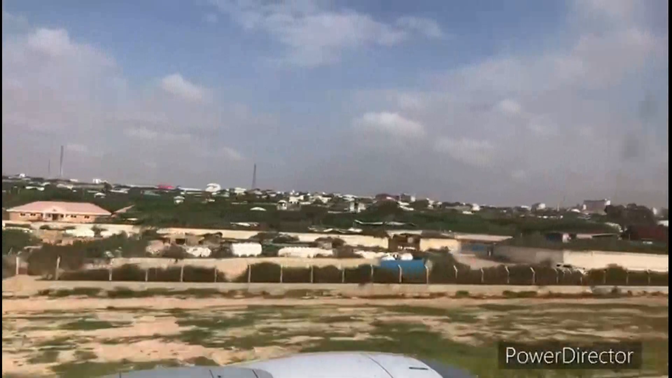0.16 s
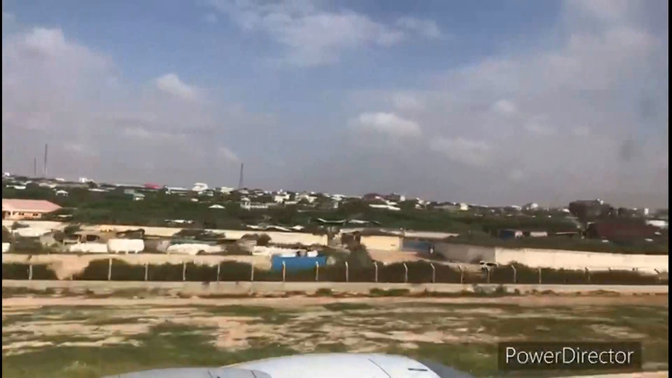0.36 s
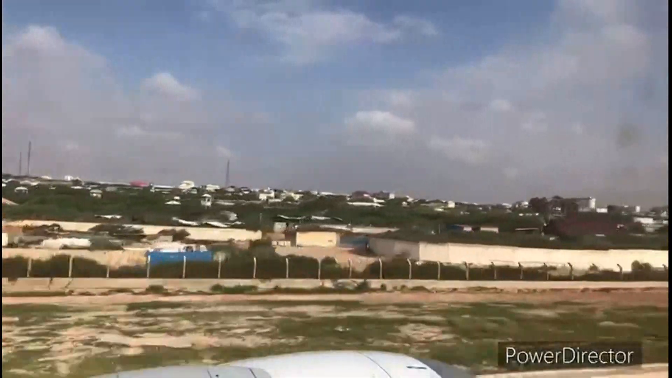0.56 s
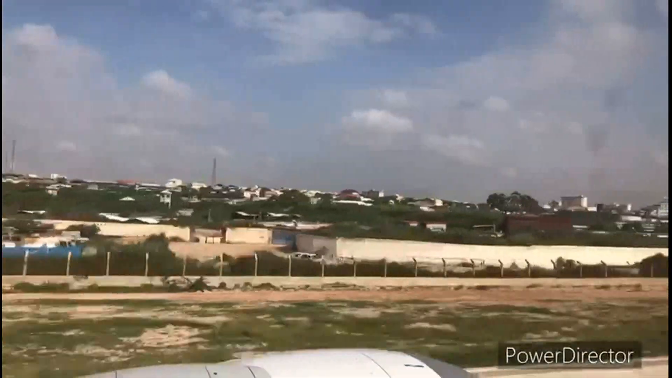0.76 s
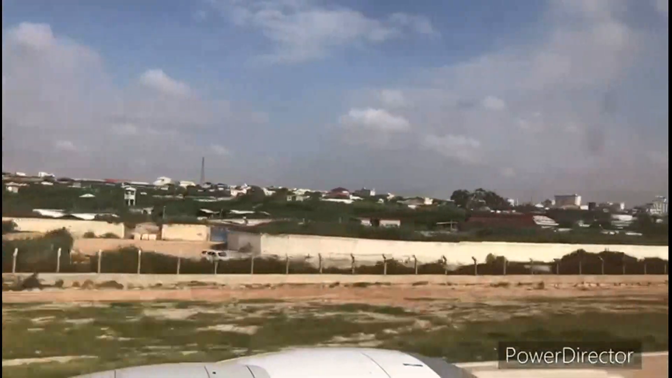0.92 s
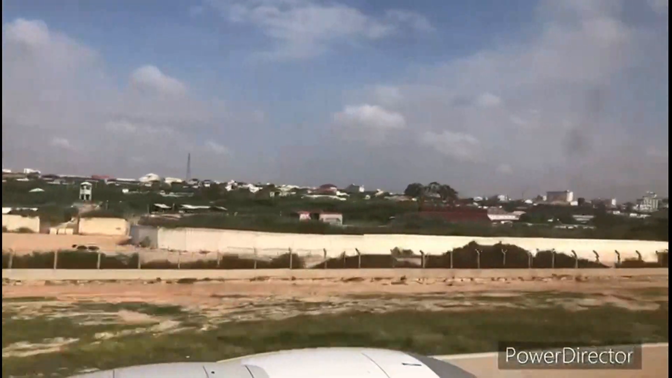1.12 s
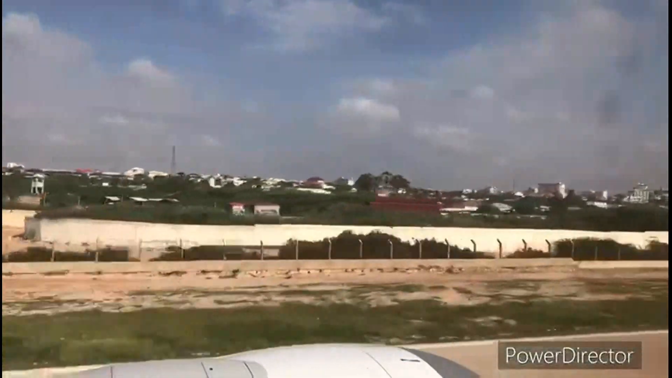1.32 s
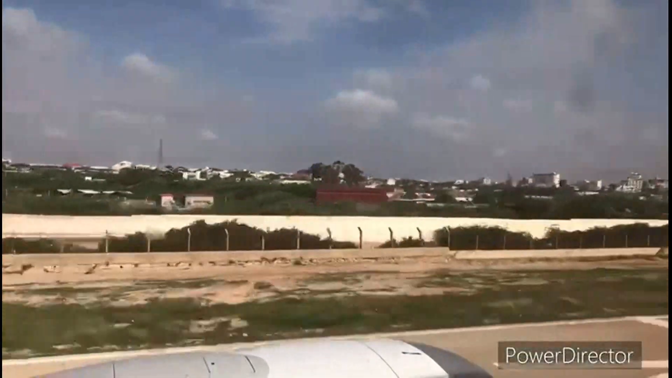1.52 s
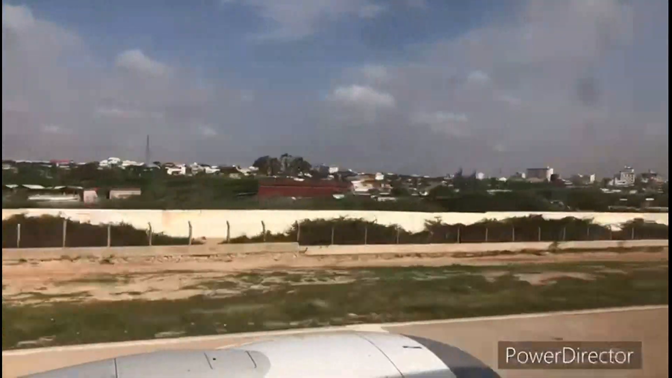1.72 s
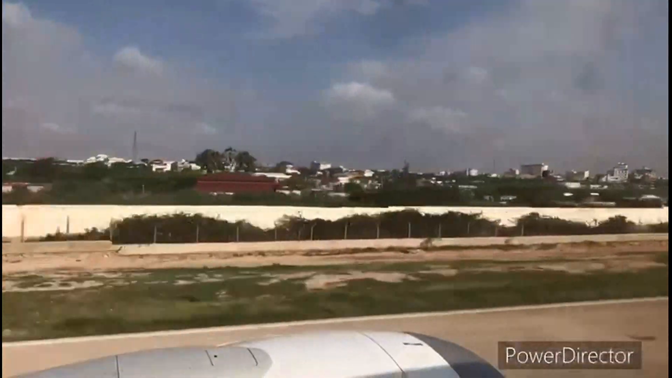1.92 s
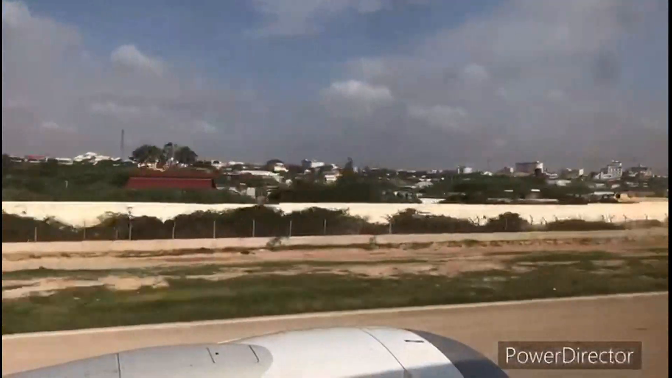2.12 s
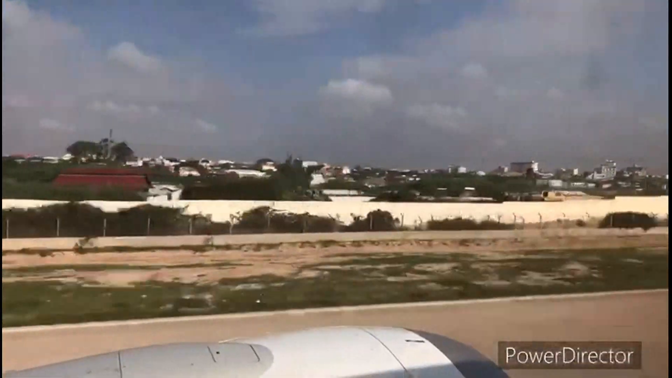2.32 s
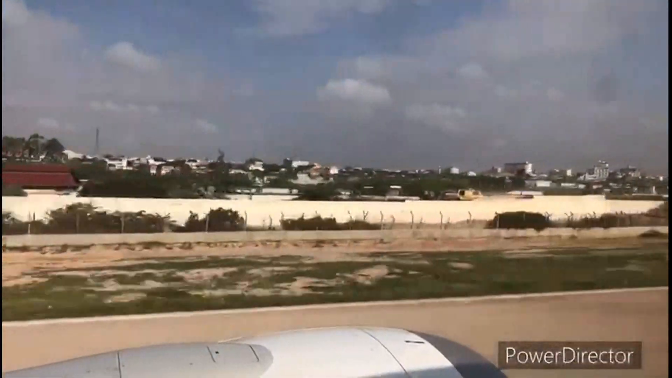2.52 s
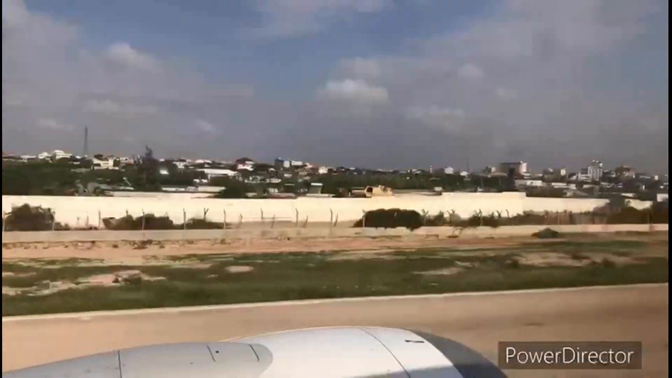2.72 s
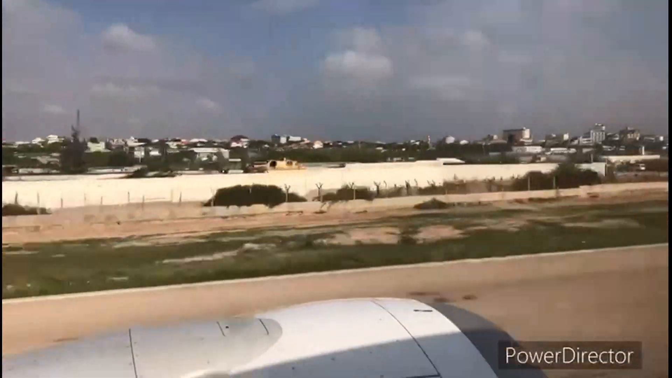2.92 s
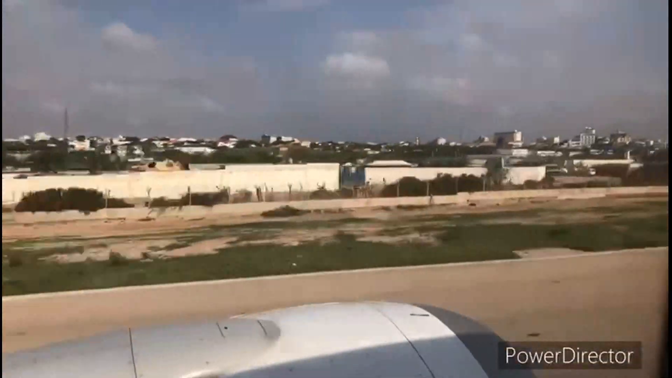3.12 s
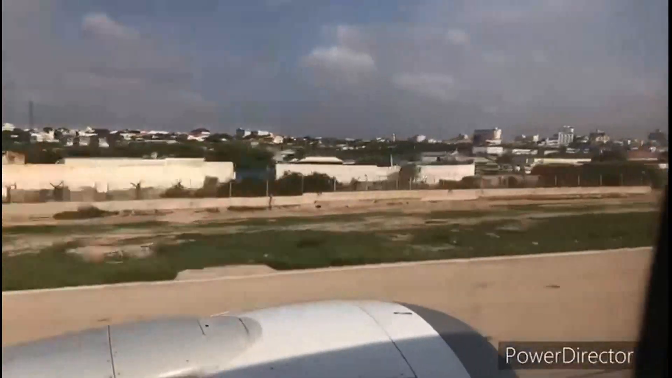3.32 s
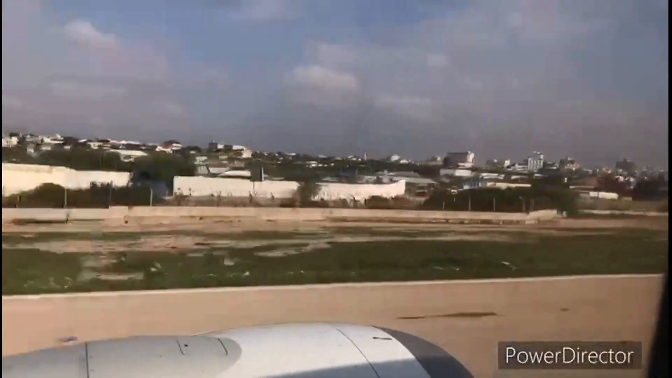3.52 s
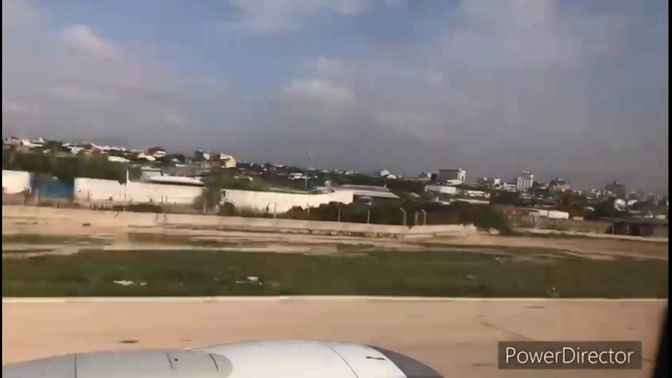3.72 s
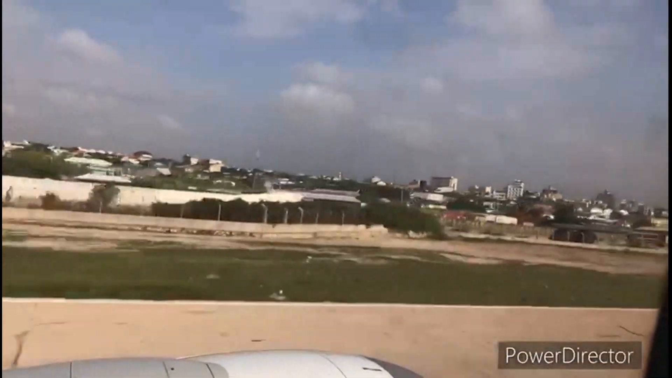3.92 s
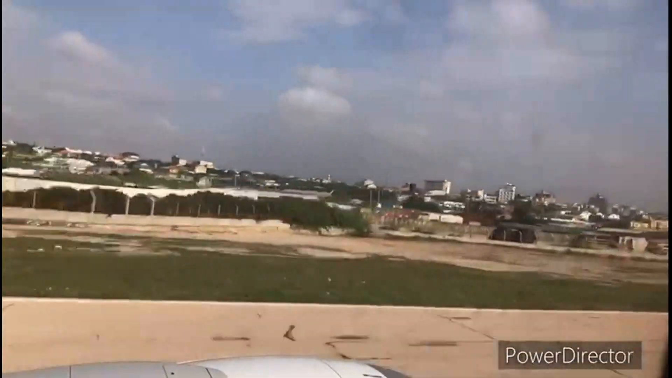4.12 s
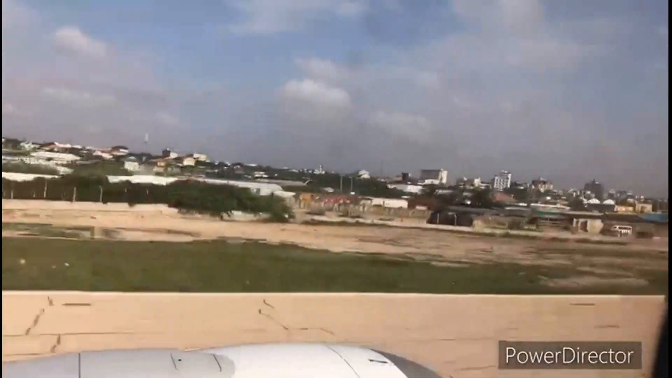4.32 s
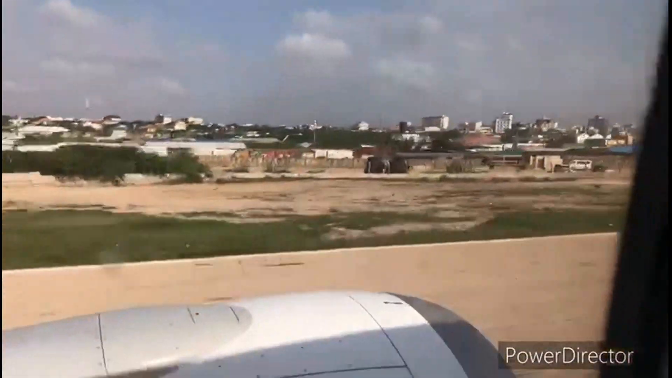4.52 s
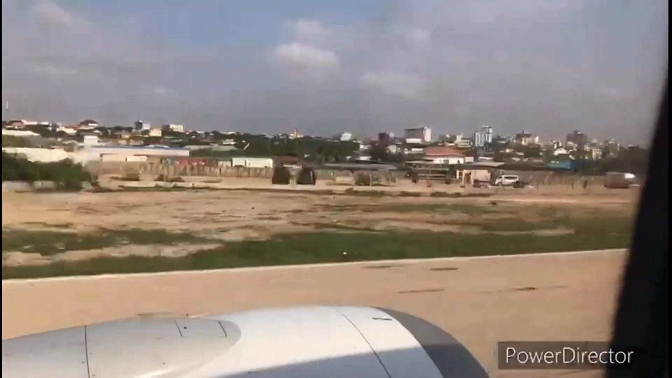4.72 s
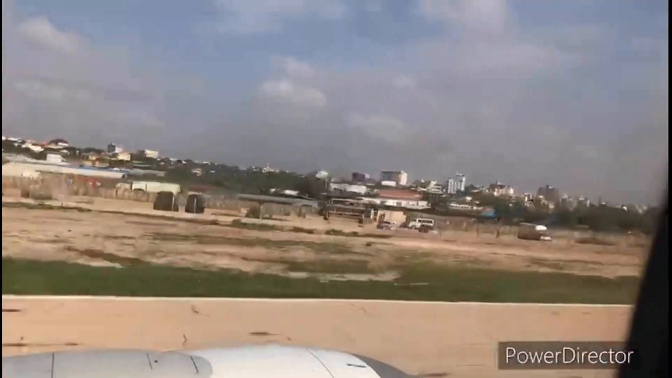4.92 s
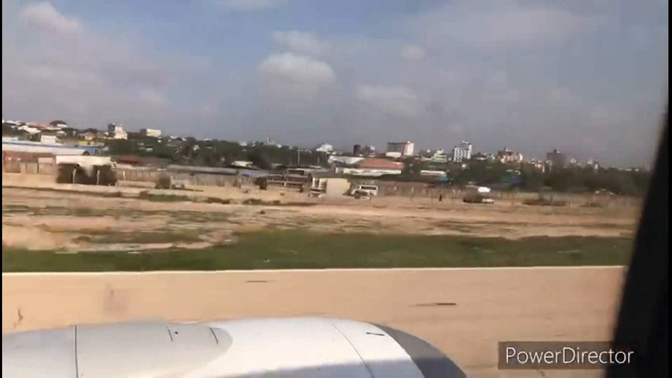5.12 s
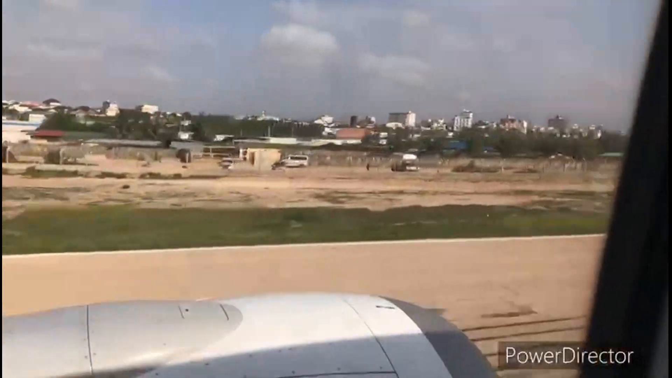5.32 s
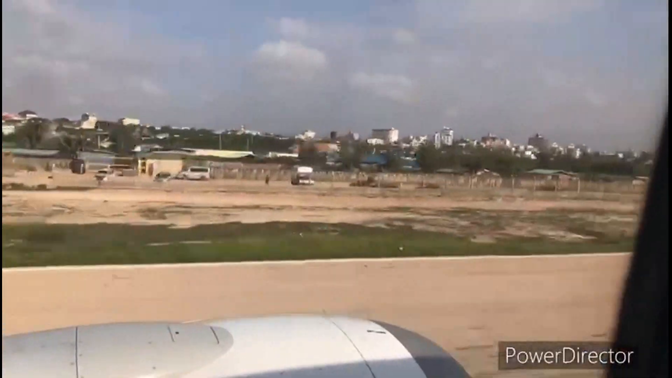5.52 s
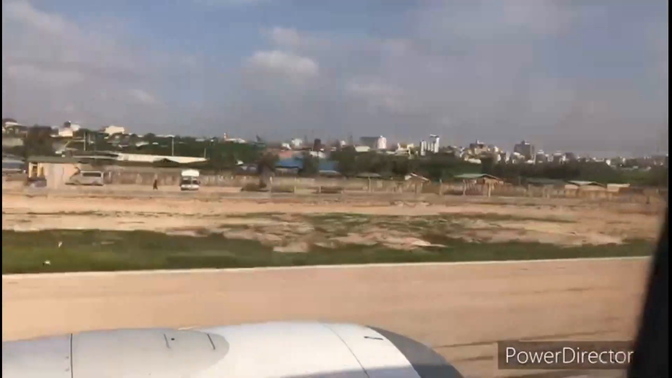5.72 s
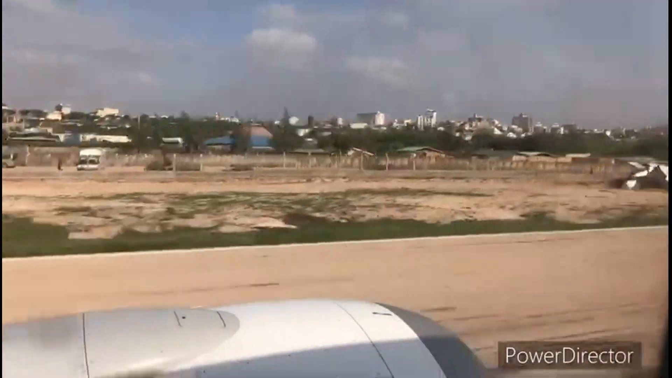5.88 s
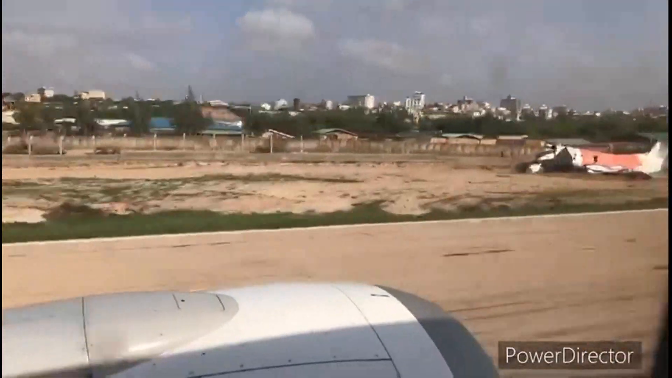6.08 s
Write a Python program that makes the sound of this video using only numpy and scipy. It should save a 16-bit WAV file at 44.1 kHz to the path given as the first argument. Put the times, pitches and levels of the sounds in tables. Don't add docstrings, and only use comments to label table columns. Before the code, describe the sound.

A phone microphone in a landing jet's cabin picks up low rushing air and fuzzy, falling engine hum. Touchdown brings uneven bumps through the floor and shaking panels, then a brief easing with a sharp knock. Rumble returns heavier, with loose fittings clattering nearby, and muffled reverse thrust builds to a loud roar that is still going at the end.

```python
import sys
import numpy as np
from scipy import signal
from scipy.fft import rfft, irfft, next_fast_len
from scipy.io import wavfile
from scipy.ndimage import uniform_filter1d

SR = 44100
rng = np.random.default_rng(int(sys.argv[2]) if len(sys.argv) > 2 else 0)


def ratio_of_db(decibels):
    return 10 ** (np.asarray(decibels, float) / 20)


def int16_out(signal):
    q = np.round(np.clip(np.atleast_2d(signal).T, -1, 1) * 32767)
    wavfile.write(sys.argv[1], SR, q.astype(np.int16))


N = 271215

# freq_hz, density_db (per Hz)
HULL_COLOUR = [(15, -45), (30, -25), (48, -1), (95, -2.5), (142, 0), (198, -4.5), (240, -5.5), (340, -9),
               (460, -16.5), (600, -21), (760, -30), (890, -27), (1080, -41), (1600, -61), (2500, -85)]
# freq_hz, density_db (per Hz)
VENT_COLOUR = [(700, -5), (1100, -1.5), (1400, -4.5), (1950, -3.5), (2500, -9.5), (2950, -9), (3260, -18.5),
               (4000, -23), (4900, -27), (7000, -27.5), (7600, -31.5), (9500, -30), (10400, -35.5),
               (11400, -34.5)]
# time_s, change_db
AIR_CHANGE = [
    (0, 0.5),
    (.6, 0),
    (1.5, 0),
    (2.6, -0.5),
    (3.3, -1.5),
    (4.0, 0),
    (5.0, 0),
    (6.15, 1),
]
# pitch_hz, level_db (rms), width_hz
ENGINE_WHINES = [(332, -47, 20), (888, -67, 30), (1491, -71, 25), (1863, -77, 15), (2542, -79, 20),
                 (3526, -97, 8), (5023, -100, 8), (6615, -100, 4)]
# time_s, pitch_hz, level_db (rms)
FAN_HUM = [(0, 156.1, -32.5), (.6, 149.6, -36.5), (.9, 133.8, -41), (1.3, 128.8, -43.5),
           (1.9, 128.9, -36.5), (2.35, 125.2, -49.5), (2.7, 137.3, -40.5), (6.15, 136, -46.5)]
# time_s, pitch_hz, level_db (rms)
CORE_TONE = [(0, 474.3, -54.5), (.6, 472, -50), (.9, 468, -55.5), (1.3, 467, -50.5), (1.9, 458.6, -48.5),
             (2.3, 457, -54), (2.6, 457, -54), (2.9, 449, -76)]
# time_s, level_db
BRAKING_THRUST = [
    (2.6, -44),
    (2.8, -33.5),
    (2.98, -33.5),
    (3.2, -56),
    (4.2, -39),
    (4.8, -40),
    (5.3, -28.5),
    (5.7, -26),
    (6.15, -33.5),
]
# freq_hz, density_db (per Hz)
ROAR_COLOUR = [(120, -14), (200, 0), (330, 2.5), (400, -2.5), (480, -9.5), (700, -19.5), (1000, -35),
               (1500, -43.5), (2500, -64)]
# centre_s, pitch_hz, level_db, length_s
HULL_HUMS = [(0.383, 50.5, -36, 0.084), (0.552, 317, -43, 0.052), (0.898, 236, -30.5, 0.048),
             (.9, 131, -32, 0.045), (1.122, 64, -37.5, 0.049), (1.649, 60, -34.5, 0.082),
             (1.75, 133.3, -41.5, 0.076), (2.001, 263.7, -36.5, .12), (2.33, 123, -38, .04),
             (2.45, 175.2, -32.5, 0.062), (2.502, 329, -40, .07), (2.579, 265.4, -35, 0.056),
             (1.393, 321, -41.5, .08), (2.73, 142.6, -30, 0.029), (2.88, 184.6, -27.5, 0.043),
             (2.927, 229, -36, 0.031), (3.058, 121, -24, 0.036), (3.15, 184.4, -29.5, 0.023),
             (3.291, 134, -28.5, 0.023), (4.14, 327, -35, .03), (4.293, 108.5, -21.5, 0.02957),
             (4.299, 224, -37, 0.032), (4.56, 134.5, -32, 0.02466), (5.0, 160.3, -27.5, 0.026),
             (5.159, 325, -36.5, 0.035), (5.64, 215.8, -27, .04), (5.822, 106.5, -19.5, 0.024),
             (5.88, 160.7, -23, .03), (5.924, 314, -30.5, 0.042), (6.05, 138.7, -25, .03),
             (0.948, 366.4, -44.5, 0.074), (1.497, 353, -46, 0.066), (0.502, 222, -40.5, 0.081),
             (0.152, 328, -44, .06), (1.999, 345.5, -45, 0.054), (2.3, 603, -55.5, .05),
             (2.8, 518, -45.5, 0.039), (2.858, 640, -50.5, .03), (1.25, 232.5, -42, 0.059),
             (5.45, 198.6, -33.5, .05), (5.948, 71.4, -23, 0.049)]
# time_s, panel_level_db
CABIN_TREMBLE = [(2.68, -66), (2.8, -52), (3.55, -56.5), (3.65, -71), (4.1, -59.5), (4.3, -59),
                 (5.0, -57.5), (5.5, -57), (6.15, -55)]
# centre_s, panel_level_db, length_s, fitting_brightness_db
SHAKING_BOUTS = [(2.815, -56, 0.037, 3), (2.902, -59, .04, 0.5), (2.998, -49, 0.047, -1.5),
                 (3.068, -58, .03, 0.5), (3.194, -57, 0.057, 1), (3.355, -47.5, 0.022, -1),
                 (3.493, -65, 0.067, 11.5), (3.553, -54.5, .03, 0), (4.023, -68.5, 0.026, 9.5),
                 (4.227, -54, 0.066, -5.5), (4.298, -50, 0.049, 0), (4.412, -54, 0.033, 2.5),
                 (4.479, -50.5, 0.033, 0.5), (4.6, -59, .03, 2), (4.702, -54, 0.047, 1),
                 (4.773, -58.5, 0.05, 4), (4.965, -53, 0.021, -3), (5.09, -56, 0.038, -1),
                 (5.207, -46.5, 0.053, -1.5), (5.293, -54, .05, -2), (5.436, -52.5, 0.051, -1),
                 (5.532, -50.5, 0.058, 0), (5.63, -53.5, 0.039, -10.5), (5.893, -53, 0.05, -6),
                 (6.086, -61, 0.02, 8.5)]
# freq_hz, density_db (per Hz)
PANEL_COLOUR = [(600, -11), (1000, -2.5), (1600, -1), (2300, 0.5), (3000, -3), (3510, -15), (4510, -35),
                (6000, -45)]
# freq_hz, density_db (per Hz)
FITTING_COLOUR = [(2500, -12), (3600, 2), (4500, 0), (6500, -1), (8500, -5), (9700, -8), (10400, -14),
                  (11300, -12), (13000, -20)]
# start_s, pitch_hz, peak_db
PANEL_TAPS = [(2.7642, 2030, -47), (2.808, 2400, -46), (2.925, 2500, -44), (2.931, 1800, -44),
              (2.9553, 2020, -43), (2.966, 2050, -41), (2.994, 2600, -43), (3.001, 2100, -46),
              (3.027, 2600, -46), (3.041, 2200, -44), (3.051, 3000, -45.5), (3.055, 4650, -57),
              (3.064, 2980, -43), (3.067, 1990, -41.5), (3.095, 2700, -48), (3.126, 1750, -47),
              (3.197, 2700, -46), (3.258, 2600, -48), (3.334, 1750, -42), (3.358, 1800, -45),
              (4.2435, 1950, -39), (4.282, 2040, -45), (4.287, 2100, -44), (4.306, 2200, -47),
              (4.329, 2300, -43), (4.383, 2100, -44), (4.4124, 2430, -44), (4.493, 1890, -48),
              (4.523, 2020, -47), (4.589, 2100, -45), (4.812, 1650, -44), (5.041, 1980, -45),
              (5.1747, 2300, -43), (5.18, 2200, -45), (5.187, 2000, -38), (5.197, 2500, -39),
              (5.217, 2500, -43), (5.233, 2300, -43), (5.244, 2200, -44), (5.3199, 1900, -41),
              (5.467, 1750, -44), (3.575, 2480, -49), (3.578, 2300, -44), (3.2235, 2250, -46),
              (6.032, 2600, -45), (6.08, 2380, -46)]
# start_s, peak_db
LATCH_CLACKS = [(1.939, -50), (2.0959, -50.5), (2.492, -55), (3.125, -46), (3.2218, -35), (3.3483, -36.5),
                (3.569, -35), (3.75, -51.5), (4.03, -40.5), (4.2429, -41.5), (4.2818, -41), (4.341, -35.5),
                (4.4534, -39.5), (4.566, -41), (4.591, -48), (5.1904, -48), (5.2214, -52), (5.358, -43.5),
                (6.0138, -46), (6.0289, -42), (6.0744, -45), (6.102, -46), (6.1361, -45)]
# pitch_hz, level_db, t60_share (of the clack's t60)
LATCH_MODES = [(1390, -15.5, 0.65), (1860, -7.5, 1.2), (2297, 3, 0.7), (2400, -12, 1.2), (2600, -5, 1.2),
               (3190, -11.5, 1.9), (3500, -13.5, .6), (3850, -21.5, .4), (4750, -19.5, 0.44)]
# freq_hz, density_db (per Hz)
LID_COLOUR = [(900, -16.5), (1500, -10.5), (2300, -2.5), (3000, -8), (3800, -12), (5500, -27)]
# start_s, peak_db, tilt_db (per octave)
PLASTIC_TICKS = [(2.807, -51, -9), (2.88, -49, 1), (2.9168, -56, -3), (3.0094, -53, -2), (3.054, -53, -7),
                 (3.3487, -57, -2), (3.4925, -54, 7), (3.5703, -58, 0.5), (3.9968, -56.5, 4),
                 (4.222, -55, 0), (4.2433, -54, -1.5), (4.2817, -50, 2.5), (4.327, -46, -0.5),
                 (4.3829, -54, 1.2), (4.4124, -53, 1), (4.4544, -61, -4), (4.566, -52, -4), (4.588, -56, 2),
                 (4.6882, -54, -5), (4.7735, -52, 2), (4.9494, -57, -2), (5.1741, -46.5, 12),
                 (5.2354, -50, -4), (5.4166, -56, -1), (5.444, -52, 4), (5.5098, -51, 0),
                 (6.0312, -59, 1.2), (6.0733, -47, -5), (6.103, -52, 5)]
# freq_hz, density_db (per Hz)
TICK_COLOUR = [(2500, -5), (4700, 1), (6500, 2), (9300, -5), (10300, -10), (11300, -11.5), (13000, -14)]
# start_s, pitch_hz, peak_db, t60_s
KNOCK_MODES = [(3.5074, 565, -20, .036), (3.5072, 1520, -28, .012), (3.5072, 2900, -19, .0062),
               (3.5072, 4100, -40, .008), (3.1541, 3030, -37, .025), (3.1545, 2550, -46, .015),
               (2.968, 505, -27, .1), (4.366, 1300, -43, .03), (4.367, 1800, -43, .025),
               (3.598, 1560, -44, .025), (3.63, 2000, -47, .03), (2.49, 1860, -50, .04),
               (4.327, 4600, -50, .02)]
# time_s, rumble_db
TYRE_ROLLING = [
    (2.66, -44),
    (2.8, -29),
    (3.45, -31.5),
    (3.8, -27.5),
    (4.15, -24.5),
    (4.75, -24.5),
    (5.1, -33),
    (5.65, -23),
    (6.15, -23),
]
# centre_s, jolt_db, length_s, place (0 gear, 1 floor, 2 frame)
RUNWAY_BUMPS = [(2.747, -24, 0.023, 1.4), (2.856, -16, 0.021, 2.65), (2.936, -15.5, 0.025, 0.95),
                (3.011, -15.5, 0.081, 1.23), (3.054, -16.5, 0.028, 2.9), (3.262, -24, 0.045, 1.5),
                (3.358, -20, 0.041, 0.74), (3.56, -18, 0.04, 0.29), (3.74, -28.5, 0.033, 0.36),
                (3.945, -28, 0.047, 2.3), (4.238, -28, 0.081, 1.6), (4.293, -15, 0.039, 0.36),
                (4.372, -22.5, 0.038, 2.1), (4.51, -16.5, 0.057, 0.55), (4.565, -18.5, 0.023, 1.05),
                (4.842, -19, 0.058, 0.68), (4.982, -19, 0.035, 1.44), (5.096, -18, 0.03, 1.47),
                (5.22, -19.5, 0.039, .3), (5.254, -15, 0.085, 1.35), (5.395, -20, 0.028, 2.8),
                (5.518, -22.5, 0.029, 1.4), (5.57, -20, 0.027, 1.2), (5.679, -18.5, 0.057, 0.57),
                (5.816, -17, 0.02, 1.34), (5.918, -22, 0.039, 1.3), (6, -14.5, 0.028, 1.27),
                (6.035, -26.5, 0.029, 2.3), (6.128, -20.5, 0.07, 0.22)]


def evened(x):
    return x / np.sqrt(np.mean(x ** 2) + 1e-20)


def add(mix, start_s, sound):
    part = mix[round(start_s * SR):][:len(sound)]
    part += sound[:len(part)]


def curves(rows):
    time_s, *columns = np.transpose(rows)
    t = np.arange(N) / SR
    gate = np.clip((t - time_s[0]) / 0.096, 0, 1)
    return [np.interp(t, time_s, column) for column in columns] + [gate]


def coloured(x, points):
    freq_hz, db = np.transpose(points)
    size = next_fast_len(len(x))
    hz = np.fft.rfftfreq(size, 1 / SR)
    log_points = np.log(np.r_[freq_hz, 2 * freq_hz[-1]] + 1)
    gain_db = np.interp(np.log(hz + 1), log_points, np.r_[db, db[-1] - 20], left=-90, right=-120)
    return evened(irfft(rfft(x, size) * ratio_of_db(gain_db), size)[:len(x)])


def resonate(x, hz, width_hz, firm=0):
    turn = np.exp(2j * np.pi * np.cumsum(hz * np.ones(len(x))) / SR)
    r = np.exp(-np.pi * width_hz / SR)
    once = signal.lfilter([1 - r], [1, -r], x / turn)
    low = signal.lfilter([1 - r], [1, -r], once)
    steady = low / (abs(low) + low.std() / 5) ** firm
    return evened((turn * steady).real)


def steadied(x, seconds, share):
    level = np.sqrt(abs(uniform_filter1d(x ** 2, round(seconds * SR))) + 1e-4)
    return evened(x / level ** share)


def levelled(x, share):
    z = signal.stft(x, nperseg=2048, noverlap=1536)[2]
    power = uniform_filter1d(abs(z) ** 2, size=3, axis=0)
    patch = abs(uniform_filter1d(power, size=11, axis=1)) / power.mean(1, keepdims=True) + 1e-3
    smooth = signal.istft(z / patch ** (share / 2), nperseg=2048, noverlap=1536)[1]
    return evened(smooth[:len(x)])


def drift(seconds):
    size = round(seconds * SR)
    return evened(uniform_filter1d(uniform_filter1d(rng.standard_normal(N), size), size))


def grains(per_s, spread_db, tail_s):
    struck = rng.random(N) < per_s / SR
    size = ratio_of_db(spread_db * np.minimum(rng.exponential(1, N), 4)) * struck
    power = signal.lfilter([1], [1, -np.exp(-1 / (tail_s * SR))], size ** 2)
    return np.sqrt(power) * rng.standard_normal(N)


def ring(hz, db, t60, phase=0, rise_s=0.00055):
    t = np.arange(round(t60 * SR)) / SR
    rise = 1 - np.exp(-(t / rise_s) ** 2)
    return ratio_of_db(db - 60 * t / t60) * np.sin(2 * np.pi * (hz * t + phase)) * rise


def burst(noise, points, db, t60):
    t = np.arange(len(noise)) / SR
    rise = 1 - np.exp(-t / 0.00022)
    return ratio_of_db(db - 60 * t / t60) * coloured(noise, points) * rise


def swelled(steady_db, events):
    slower_fall = 1.1
    power = ratio_of_db(2 * steady_db)
    for s, db, length in events:
        u = np.linspace(-3, 3 * slower_fall, round(3 * (1 + slower_fall) * length * SR))
        bell = np.exp(-np.where(u < 0, u, u / slower_fall) ** 2)
        add(power, s - 3 * length, ratio_of_db(2 * db) * bell)
    return 10 * np.log10(power)


def airflow():
    hull_db = -29 + curves(AIR_CHANGE)[0] + 0.21 * drift(0.73)
    hull = ratio_of_db(hull_db) * levelled(coloured(rng.standard_normal(N), HULL_COLOUR), 0.41)
    vent_db = -59.5 + 0.5 * drift(0.039)
    vent = ratio_of_db(vent_db) * coloured(rng.standard_normal(N), VENT_COLOUR)
    return hull + vent


def engine_tones():
    whines = sum(ratio_of_db(db) * resonate(rng.standard_normal(N), hz, width) for hz, db, width in ENGINE_WHINES)
    fan_hz, fan_db, _ = curves(FAN_HUM)
    fan = ratio_of_db(fan_db) * resonate(rng.standard_normal(N), fan_hz, 7.9, firm=0.91)
    core_hz, core_db, _ = curves(CORE_TONE)
    core = ratio_of_db(core_db) * resonate(rng.standard_normal(N), core_hz, 3.4, firm=0.8)
    return whines + fan + core


def braking_roar():
    roar_db, gate = curves(BRAKING_THRUST)
    roar = levelled(coloured(rng.standard_normal(N), ROAR_COLOUR), 0.26)
    return gate * ratio_of_db(roar_db - 3.0) * roar


def hull_hums():
    out = np.zeros(N)
    for (s, hz, db, length), noise in zip(HULL_HUMS, rng.standard_normal((len(HULL_HUMS), SR))):
        swell = np.hanning(min(round(5 * length * SR), SR))
        hum = resonate(noise, hz, 14.2, firm=0.9)[-len(swell):]
        add(out, max(s - len(swell) / SR / 2, 0), ratio_of_db(db) * swell * hum)
    return out


def shaking_levels():
    calm_rustle_db, bout_rustle_db = -20, -16.5
    tremble_db, gate = curves(CABIN_TREMBLE)
    panel_bouts = [(s, db, length) for s, db, length, _ in SHAKING_BOUTS]
    fitting_bouts = [(s, db + bout_rustle_db + bright_db, length) for s, db, length, bright_db in SHAKING_BOUTS]
    panels_db = swelled(tremble_db, panel_bouts)
    fittings_db = swelled(tremble_db + calm_rustle_db, fitting_bouts)
    return panels_db, fittings_db, gate


def trim():
    rattle_db, rustle_db, gate = shaking_levels()
    clicks = grains(per_s=1400, spread_db=1.8, tail_s=0.004)
    rattle = steadied(coloured(clicks, PANEL_COLOUR), 0.091, 0.59)
    jolts = evened(grains(per_s=390, spread_db=1.0, tail_s=0.0032)) + 0.4 * evened(clicks)
    rustle = steadied(coloured(jolts, FITTING_COLOUR), 0.072, 0.8)
    return gate * (ratio_of_db(rattle_db - 4.0) * rattle + ratio_of_db(rustle_db) * rustle)


def panel_taps():
    t60, upper_ratio, upper_db = 0.022, 1.28, -9
    out = np.zeros(N)
    for s, hz, db in PANEL_TAPS:
        add(out, s, ring(hz, db, t60) + ring(hz * upper_ratio, db + upper_db, t60))
    return out


def latch_clacks():
    t60 = 0.045
    out = np.zeros(N)
    luck = rng.random((len(LATCH_CLACKS), len(LATCH_MODES), 3))
    noises = rng.standard_normal((len(LATCH_CLACKS), 6000))
    for (s, db), draws, noise in zip(LATCH_CLACKS, luck, noises):
        add(out, s, burst(noise, LID_COLOUR, db - 15, 2 * t60))
        for (hz, mode_db, share), (a, b, c) in zip(LATCH_MODES, draws):
            struck_hz = hz * (1 + 0.025 * (a - 0.5))
            struck_db = db + mode_db - 5.5 + 3 * (b - 0.5)
            add(out, s + 0.001 * c, ring(struck_hz, struck_db, t60 * share, c))
    return out


def plastic_ticks():
    out = np.zeros(N)
    for (s, db, tilt_db), noise in zip(PLASTIC_TICKS, rng.standard_normal((len(PLASTIC_TICKS), 3000))):
        colour = [(hz, level_db + tilt_db * np.log2(hz / 7000)) for hz, level_db in TICK_COLOUR]
        add(out, s, burst(noise, colour, db - 7, 0.034))
    return out


def knocks():
    out = np.zeros(N)
    for s, hz, db, t60 in KNOCK_MODES:
        add(out, s, ring(hz, db, t60, rise_s=0.0009))
    return out


def rolling_levels():
    away_db = 7
    roll_db, gate = curves(TYRE_ROLLING)
    levels = []
    for k, part_db in enumerate([-6, -1.5, -0.8]):
        jolts = [(s, db - away_db * (place - k) ** 2, length) for s, db, length, place in RUNWAY_BUMPS]
        levels.append(swelled(roll_db + part_db, jolts))
    return levels + [gate]


def runway():
    thud_db, boom_db, shudder_db, gate = rolling_levels()
    thud = resonate(rng.standard_normal(N), 52, 15, firm=0.9)
    boom = resonate(rng.standard_normal(N), 73, 26, firm=0.85)
    shudder = steadied(resonate(rng.standard_normal(N), 120, 90), 0.059, 1.0)
    return gate * (ratio_of_db(thud_db - 2.5) * thud + ratio_of_db(boom_db - 4.5) * boom + ratio_of_db(shudder_db - 1.03) * shudder)


def scene():
    background = airflow() + engine_tones() + braking_roar() + hull_hums()
    cabin = trim() + panel_taps() + latch_clacks() + plastic_ticks() + knocks()
    return (background + cabin + runway())[None]


def patchy(x):
    from_hz, patchy_db, hole_db = 1900, 0.9, -14
    hz, t, z = signal.stft(x, SR, nperseg=1024, noverlap=768)
    thin, wide = rng.standard_normal((2,) + z.shape[1:])
    thin = evened(uniform_filter1d(uniform_filter1d(thin, size=3, axis=0), size=8, axis=1))
    wide = evened(uniform_filter1d(uniform_filter1d(wide[::8, ::4], size=2, axis=0), size=2, axis=1))
    wide = np.kron(wide, np.ones((8, 4)))[:len(hz), :len(t)]
    depth = np.clip(np.log2((hz + 1) / from_hz), 0, 1.3)[:, None]
    treble_power = (abs(z[0, hz > 5000]) ** 2).mean(0)
    treble_db = 10 * np.log10(uniform_filter1d(treble_power, size=12) + 1e-20)
    busy = np.clip((treble_db - np.percentile(treble_db, 20)) / 10, 0, 1)
    strips = thin * depth < -2.0
    blocks = (hz[:, None] > 8800) & (wide < -2.3 + 1.4 * busy)
    change_db = depth * patchy_db * (thin + busy * wide) + hole_db * (strips | blocks)
    return signal.istft(z * ratio_of_db(change_db), SR, nperseg=1024, noverlap=768)[1][:, :N]


def roll_off(x):
    return signal.sosfilt(signal.butter(12, 15720, fs=SR, output="sos"), x)


def record(dry):
    cut = signal.sosfilt(signal.butter(4, 38, "high", fs=SR, output="sos"), dry)
    band_limit = signal.firwin(301, 11920, window=("kaiser", 6), fs=SR)
    limited = signal.oaconvolve(cut, band_limit[None], "same")
    floor = ratio_of_db(-96) * rng.standard_normal(cut.shape)
    loudness = np.sqrt(abs(uniform_filter1d(cut[0] ** 2, size=6000)))
    floor += ratio_of_db(-84) * loudness * resonate(floor[0], 15600, 220)
    finished = patchy(limited + floor)
    return roll_off(finished)


dry = scene()
out = record(dry)
int16_out(out)
```